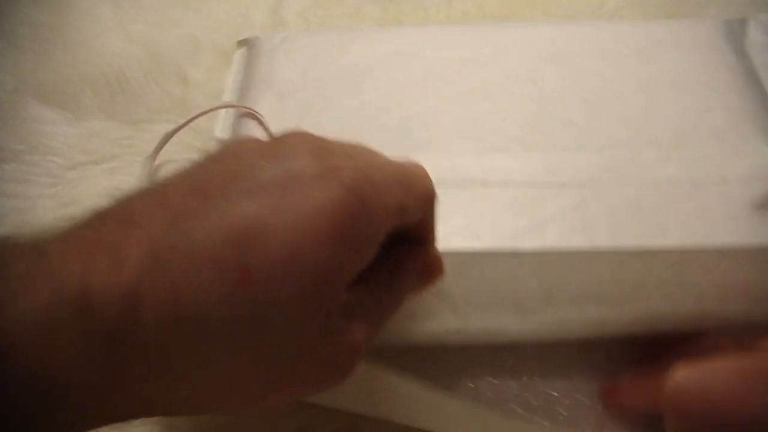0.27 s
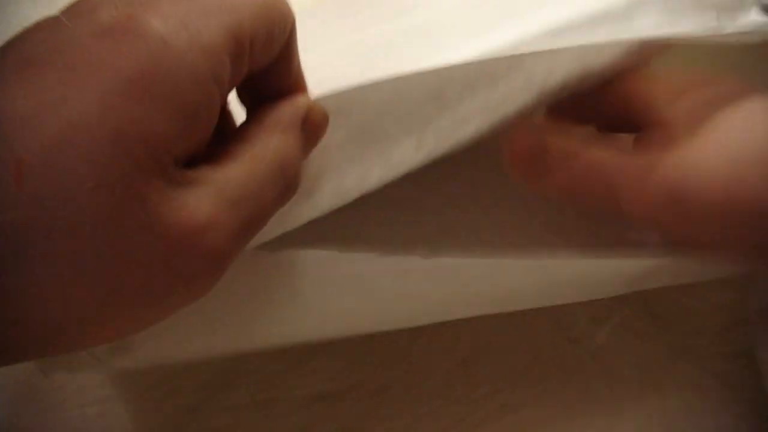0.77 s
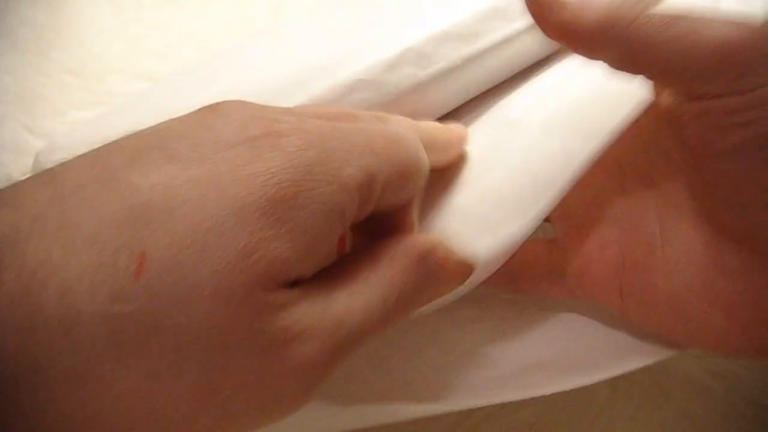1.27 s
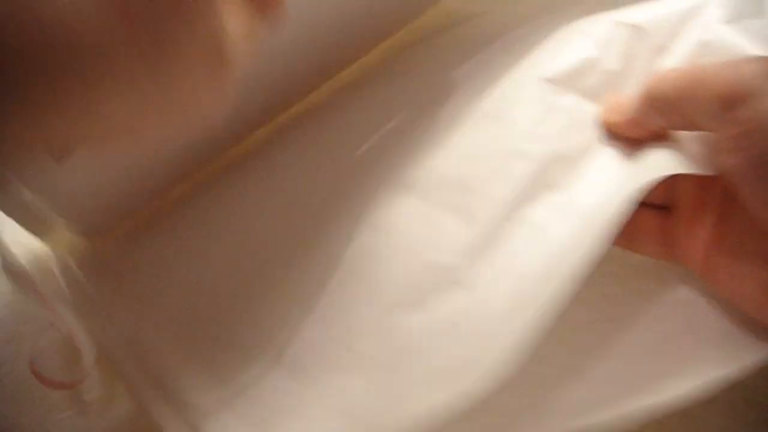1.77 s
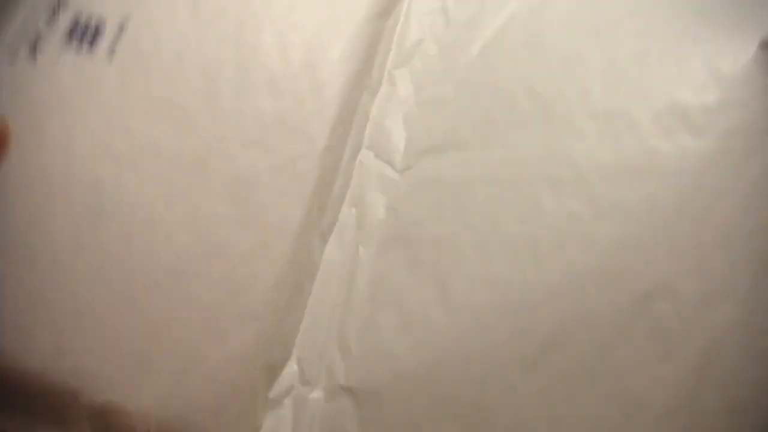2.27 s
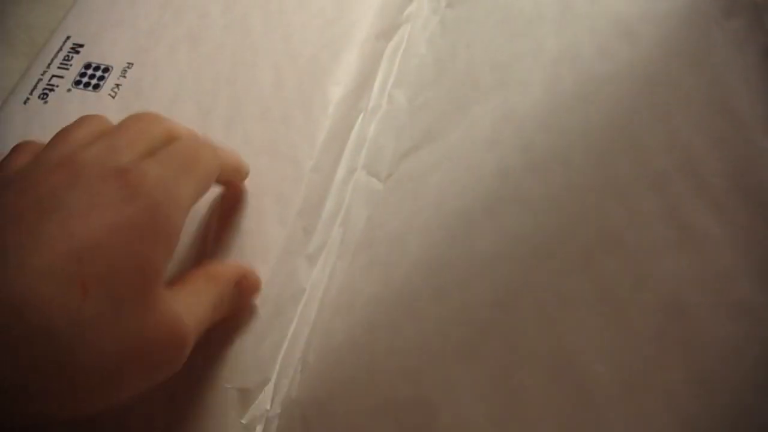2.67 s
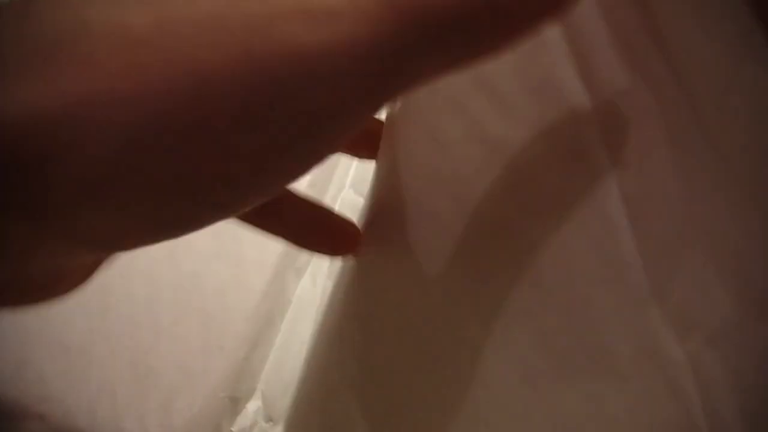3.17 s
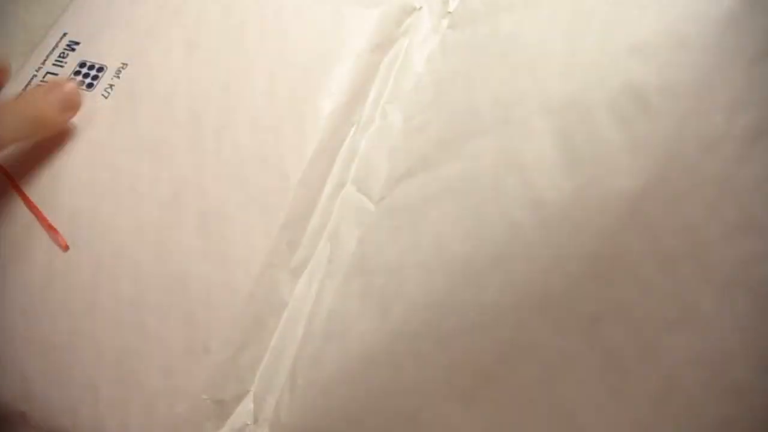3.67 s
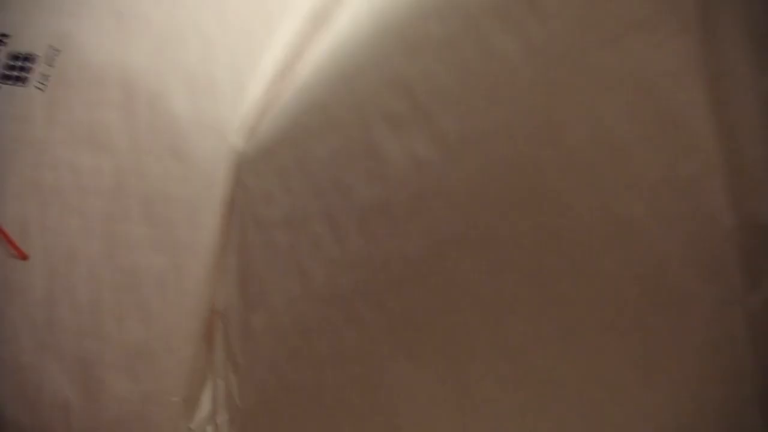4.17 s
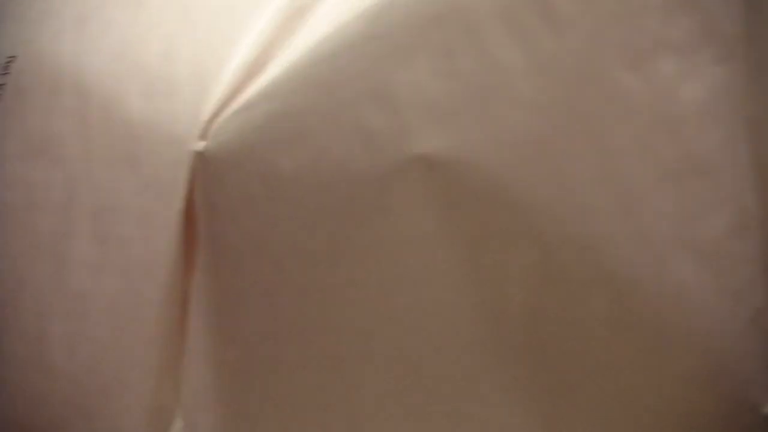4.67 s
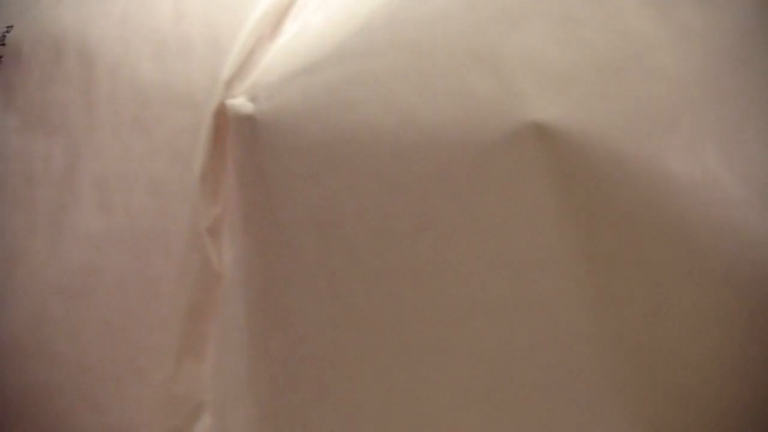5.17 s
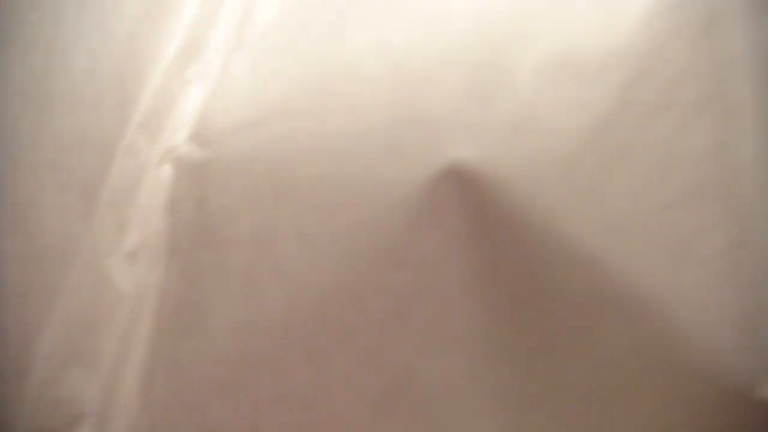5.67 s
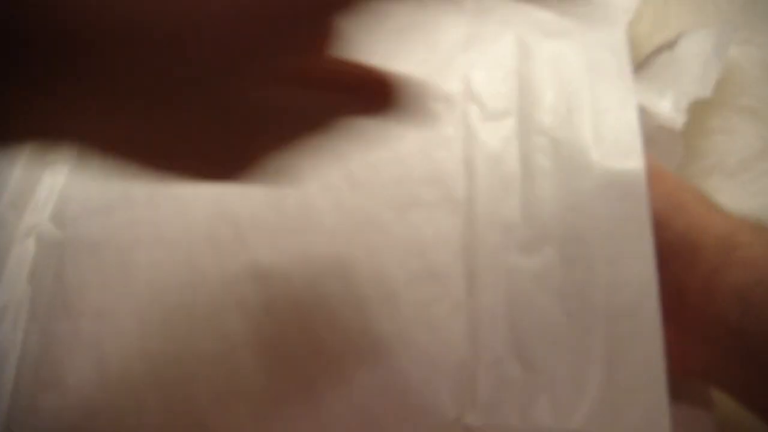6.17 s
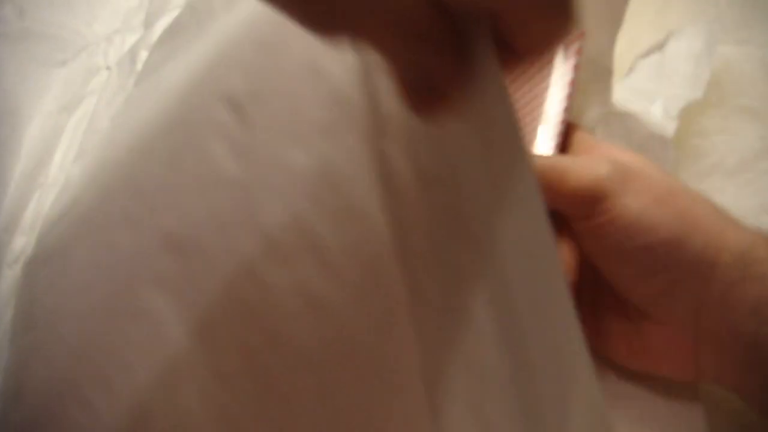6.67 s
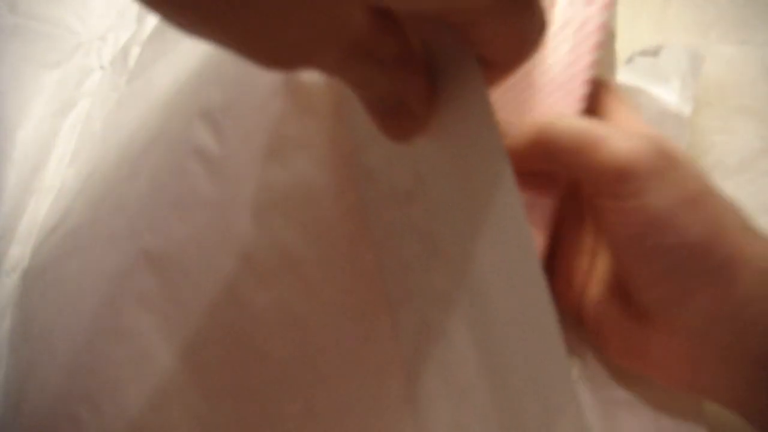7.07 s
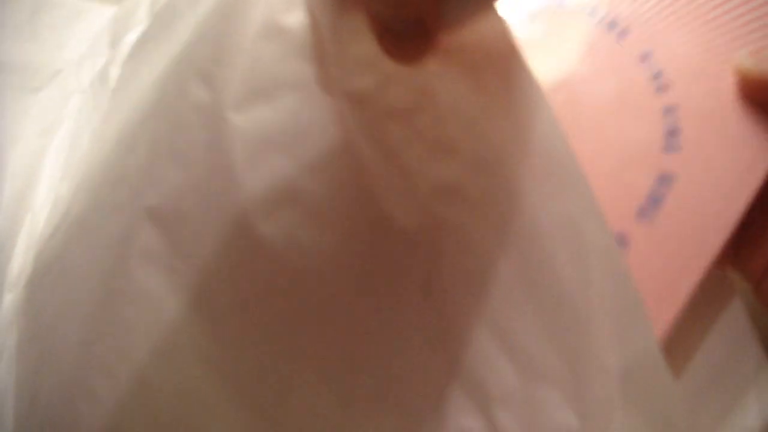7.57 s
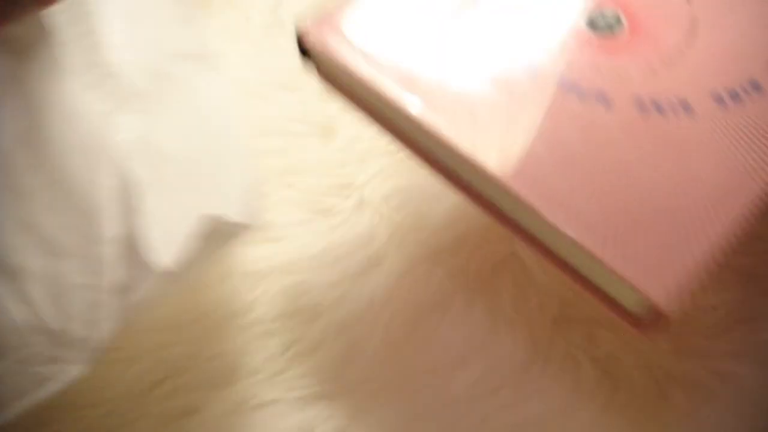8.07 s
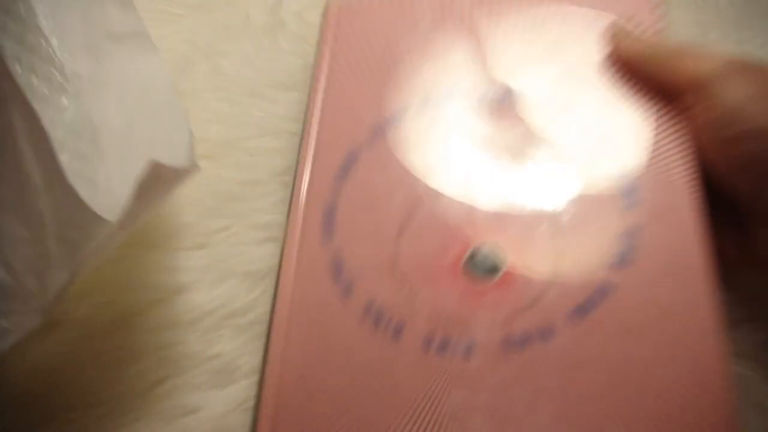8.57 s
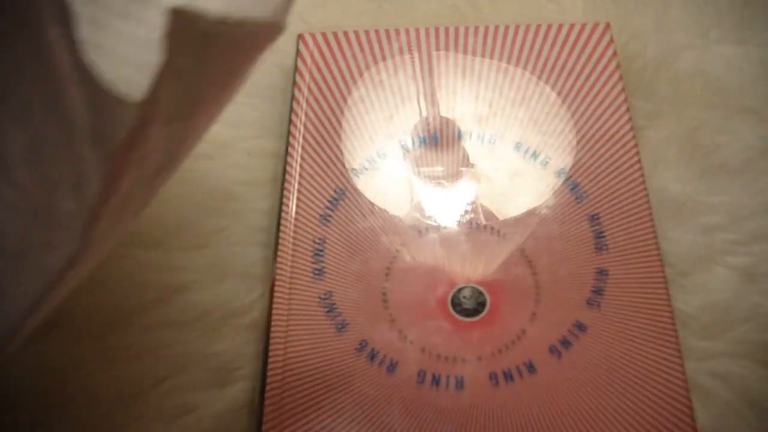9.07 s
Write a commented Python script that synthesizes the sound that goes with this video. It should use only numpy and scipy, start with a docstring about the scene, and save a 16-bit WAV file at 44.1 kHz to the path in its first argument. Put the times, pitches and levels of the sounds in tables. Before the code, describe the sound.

In a quiet, dry room, hands work a padded paper mailer very close to a small stereo camera. From 0 to 1.5 s, bright papery strokes, crackles and hard snaps come in quick succession, one especially sharp near 0.4 s, with dull envelope thumps. At about 1.6 s an edge catches in a short, quickening zip of ticks. From 2 to 4 s rustling continues in uneven bursts, with strong snaps near 2.6 and 4 s. Crumpling thickens around 5.3 to 5.9 s, then nearly pauses until 6.4 s. Dense, crunchy creasing resumes, leaning right, loudest around 7.2 to 7.6 s, with low bumps and rubbing as a book slides out. After 7.9 s only faint scuffs and a couple of small ticks remain over soft steady hiss and a barely audible thin whine, until about 9.3 s.

```python
"""Opening a padded paper mailer

Hands close to a small camera pull open a padded mailer, turn it over and slide a book out onto a soft rug.
Strokes drive noise grains: sliding fibres hiss, folds crackle and crumple, the slack envelope flaps low down.
Creases snap as noise bursts with a damped sine ring; thumps, scuffs and one zip-like run are resonant noise.
The room is quiet and dead, with soft hiss and a thin whine; two microphones hear the treble differently,
and the sharpest snaps overload them."""
import sys
import numpy as np
from scipy import signal
from scipy.fft import rfft, irfft
from scipy.io import wavfile
from scipy.ndimage import uniform_filter1d

SR = 44100
rng = np.random.default_rng(int(sys.argv[2]) if len(sys.argv) > 2 else 0)


def unload_wav(signal):
    """Save mono or channel-first audio to the path in sys.argv[1] as 16-bit WAV at rate SR, clipped to [-1, 1]."""
    wavfile.write(
        sys.argv[1],
        SR,
        np.round(np.clip(np.atleast_2d(signal).T, -1, 1) * 32767).astype(np.int16),
    )


N = 411894

# Strokes of the hands over the paper. Each row: start in seconds, length in seconds,
# sliding drive in dB, bend from 0 (flat slide) to 1 (crumple).
HAND_STROKES = [(0.012, 0.075, -25, .1), (0.081, 0.024, -16.5, 0.55), (0.138, 0.061, -24.5, 1),
                (0.238, 0.1, -25.5, 0.46), (0.328, 0.24, -25.5, 0.24), (0.588, .05, -23, 0.34),
                (0.678, 0.082, -22.5, .05), (0.767, 0.067, -19.5, 0.61), (0.862, 0.066, -22.5, 0.4),
                (0.946, 0.093, -20, 0.15), (1.056, .12, -25.5, 0.47), (1.194, 0.007, -18.5, 0.72),
                (1.34, 0.058, -16.5, 0.51), (1.406, 0.02, -25.5, 0.95), (1.483, 0.13, -27.5, 0.65),
                (1.877, 0.095, -23, .35), (2.008, .11, -26.5, 0.64), (2.23, 0.12, -27.5, 0.17),
                (2.425, 0.17, -27.5, 0.78), (2.79, 0.014, -21, 0.89), (2.832, 0.043, -23.5, 0.81),
                (2.893, 0.042, -16.5, 0.52), (3.014, 0.043, -17, 0.36), (3.086, 0.017, -16.5, 0.66),
                (3.301, 0.15, -24, 0.73), (3.463, 0.18, -22.5, 0.7), (3.66, 0.26, -29, 0.11),
                (3.862, 0.078, -22.5, 0.58), (3.983, .09, -31, 0.61), (4.067, 0.16, -21, 0.19),
                (4.234, 0.22, -24, 0.75), (4.49, 0.12, -24, 0.21), (4.633, 0.047, -22, 0.69),
                (4.695, 0.09, -25.5, .25), (4.907, 0.062, -28.5, 0.85), (4.999, .03, -22.5, 0.28),
                (5.053, 0.064, -27, 0.7), (5.274, 0.064, -21, 0.68), (5.334, 0.048, -18, 0.73),
                (5.4, 0.049, -23, 0.81), (5.443, 0.12, -21, 0.93), (5.556, 0.15, -22.5, 0.92),
                (5.703, 0.068, -23.5, 0.99), (5.788, 0.11, -22.5, 0.74), (6.03, 0.13, -33.5, 0.34),
                (6.48, 0.055, -26.5, 0.43), (6.531, 0.025, -18.5, 0.81), (6.589, 0.05, -23, 0.6),
                (6.647, 0.031, -16, 0.87), (6.709, 0.055, -23.5, 0.66), (6.804, 0.093, -30, 0.14),
                (7.077, 0.098, -25.5, .7), (7.202, 0.12, -23, 0.82), (7.327, 0.11, -23.5, 1.0),
                (7.466, 0.11, -29, 1.0), (7.59, 0.066, -24.5, 0.44), (7.651, .055, -21, 0.9),
                (7.742, 0.17, -28, 0.41), (8.052, 0.084, -36.5, 0.52), (8.172, 0.088, -36.5, 0.54),
                (8.297, .03, -48, .1), (8.38, 0.021, -55, .1), (8.45, 0.032, -42.5, 0.092),
                (8.574, 0.12, -45.5, 0.89), (9.002, 0.11, -44.5, 0.73)]
# Light contact between strokes. Each row: time in seconds, sliding drive in dB.
LIGHT_CONTACT = [(0, -25.5), (1.16, -42), (1.25, -42), (1.33, -24.5), (1.47, -37), (1.7, -28.5),
                 (2.75, -30), (4.85, -27.5), (5.2, -30.5), (5.95, -31.5), (6.25, -39), (7.05, -33.5),
                 (7.9, -41), (8.0, -40.5), (9.34, -44)]
# The main creases that snap through. Each row: time in seconds, overall drive in dB,
# brightness in dB (trades sheet for tick), ring in Hz.
MAIN_CREASES = [(0.02, -33.5, 16, 6000), (.1277, -15, 3, 2380), (0.1466, -19.5, 0, 3295),
                (0.2491, -17.5, 5, 5370), (0.261, -21.5, -4, 1960), (0.333, -23, 6.5, 2810),
                (0.387, -7, 1, 4460), (.453, -23.5, -2, 1920), (.548, -26.5, 2, 5130),
                (0.5842, -25, 8, 5130), (0.6206, -22, -2.5, 1370), (0.7371, -23.5, -3.5, 3830),
                (0.7936, -26, -4, 1240), (0.816, -20, 6, 5040), (.882, -20.5, 1.5, 3400),
                (.9214, -19.5, -1, 5000), (.9374, -26, 9.5, 2890), (1.017, -21.5, -3, 2145),
                (1.03, -23.5, 10, 5040), (1.0413, -28, 10, 5060), (1.0864, -17.5, 5, 6120),
                (1.2082, -13.5, 3, 2310), (1.2792, -24.5, 5, 4030), (1.2917, -24, 4, 5040),
                (1.3026, -21, 2, 3950), (1.386, -22, 1, 5730), (1.3985, -18.5, 2, 5200),
                (1.4287, -21.5, 5, 2560), (1.4407, -16, 2, 2980), (1.4965, -28, 5, 4740),
                (1.5564, -22, -1, 1190), (1.6486, -22, 3.5, 3960), (1.8011, -25, 4, 3570),
                (1.897, -21.5, -4.5, 1430), (1.9514, -19.5, -5, 1910), (2.065, -22.5, -2, 1265),
                (2.4776, -16, -1, 1890), (2.573, -22.5, 0.5, 4100), (2.6032, -12.5, -2, 5480),
                (2.8047, -20.5, 3, 4150), (2.856, -21, -6, 1380), (3.0464, -15.5, 1.5, 4750),
                (3.0589, -17, 2.5, 2955), (3.16, -26, -0.5, 5020), (3.183, -18, 0, 2015),
                (3.215, -23.5, 0.5, 3430), (3.2744, -17.5, 3, 4850), (3.319, -29.5, -10, 830),
                (3.3597, -31, -9, 1440), (3.408, -23, -5, 3820), (3.422, -28, -4, 1950),
                (3.5638, -16.5, -1.5, 730), (3.6182, -24.5, -6.5, 1026), (3.9992, -28, -5, 1610),
                (4.0101, -14, -7.5, 2330), (4.059, -19, -3.5, 1574), (4.0754, -17, 1, 3537),
                (4.1525, -16, -3, 2065), (4.3366, -23.5, -1, 4030), (4.4276, -19.5, -7.5, 2200),
                (4.493, -25, 1, 4540), (4.7476, -19.5, -1.5, 1550), (4.7652, -21, -4.5, 1780),
                (4.9062, -19, 3, 5220), (5.0107, -15.5, 0, 2384), (5.0215, -14.5, 2.5, 5050),
                (5.0998, -21, -3, 3650), (5.2455, -25, 2.5, 3396), (5.2713, -19, -3, 2100),
                (5.3682, -15, -4, 840), (5.3807, -20, -1, 3480), (5.4573, -18, -3, 2950),
                (5.4845, -16.5, 2, 3190), (5.623, -15, 2.5, 2530), (5.643, -20.5, 4, 2850),
                (5.709, -19, -5, 4970), (5.7553, -20, 1, 4680), (5.8281, -16.5, -0.5, 2610),
                (5.8638, -19, 3, 5060), (5.8888, -15.5, 4, 2186), (5.907, -17, -1, 2380),
                (6.139, -42, -11, 1350), (6.376, -42, 3, 3870), (6.434, -35, -4, 1600),
                (6.4498, -29, -1.5, 3690), (6.497, -18.5, 0.5, 3660), (6.5405, -18.5, -5, 1455),
                (6.716, -13.5, -2.5, 3080), (6.752, -20, 6, 4480), (6.775, -26, -9, 785),
                (6.855, -23.5, 3.5, 1420), (6.9276, -25, 2.5, 2720), (7.0063, -27, -0.5, 3120),
                (7.0977, -20, -2.5, 1890), (7.212, -19.5, 3, 4260), (7.2214, -18, 0.5, 4090),
                (7.273, -16.5, -2, 1416), (7.291, -16.5, 0, 1010), (7.3494, -11, 1.5, 5940),
                (7.3811, -21, 1, 1300), (7.4056, -15.5, -3, 1700), (7.4317, -20, 5, 5230),
                (7.446, -16.5, -0.5, 786), (7.4813, -20.5, 8.5, 2480), (7.5243, -19, -8.5, 863),
                (7.5352, -21, 4, 2330), (7.573, -16, -7, 830), (7.6843, -20.5, -3, 2550),
                (7.7263, -21.5, 0.5, 2420), (8.3558, -27.5, 1, 4040), (8.7138, -35.5, 8.5, 5980)]
# The padded envelope buckles or is bumped. Each row: time in seconds, relative level in dB, pitch in Hz.
ENVELOPE_THUMPS = [(0.099, -22.5, 252), (0.149, -34, 240), (0.786, -23, 310), (0.955, -30.5, 104),
                   (1.130, -26, 380), (1.209, -27.5, 116), (1.355, -23, 420), (1.443, -27, 260),
                   (1.850, -24, 457), (2.475, -22, 360), (2.603, -23, 330), (2.93, -38, 80),
                   (3.049, -39, 75), (3.565, -25, 200), (4.008, -28, 363), (5.46, -36, 75),
                   (4.426, -36, 168), (6.55, -19, 360), (7.23, -40, 80), (7.42, -31, 95), (7.665, -20, 230),
                   (7.806, -33.5, 160)]
# Fingers and the book scuff the paper. Each row: start in seconds, length in seconds, pitch in Hz,
# width in Hz, middle level in dB.
PAPER_SCUFFS = [(0.674, 0.088, 8050, 1500, -20), (2.883, 0.032, 3670, 1200, -16),
                (3.337, 0.036, 5800, 453, -21.5), (7.336, 0.092, 1090, 600, -20),
                (7.676, 0.028, 710, 300, -25), (7.811, 0.046, 1900, 804, -28.5),
                (7.894, 0.023, 1350, 350, -30), (8.034, 0.035, 1150, 1000, -35),
                (8.202, 0.026, 1480, 1000, -37), (8.883, 0.12, 1560, 750, -48)]
# An edge catches and slips in a quick run. Each row: time in seconds, slips per second, relative level in dB.
EDGE_SLIPS = [(1.594, 76, -19.5), (1.636, 92, -22), (1.675, 110, -23.5), (1.715, 128, -25),
              (1.748, 120, -33)]

# Colours of the paper: sliding fibres, crumpling folds, flexing envelope, ringing sheet,
# cracking crease and fibre tick. Each row: frequency in Hz, relative level in dB.
SLIDE_COLOUR = [(300, -38.5), (1200, -9), (2100, -5.5), (3400, -2.5), (6000, -1), (8500, 0), (11000, -1),
                (14500, -3.5)]
CRUMPLE_COLOUR = [(150, -28), (380, -12.5), (520, -5.5), (780, 3), (1020, -0.5), (1320, -0.5), (1900, -1),
                  (3000, -2), (7000, -23.5), (14000, -33)]
FLEX_COLOUR = [(15, -14), (35, -7), (65, -3), (120, -2), (200, -0.5), (400, 4), (550, -3.5), (1100, -14.5),
               (4000, -46)]
SHEET_COLOUR = [(50, -39.5), (200, -15.5), (500, -6), (780, 2.5), (1020, 2), (1350, 3.5), (1900, 1),
                (2600, -16), (6000, -41.5)]
CRACK_COLOUR = [(500, -38), (1400, -8.5), (2200, 2.5), (3600, 2), (5500, -1.5), (7500, -29), (14000, -26)]
TICK_COLOUR = [(1500, -25), (4500, -4), (6500, 3.5), (10000, 1.5), (14500, -1)]
# Steady background hiss. Each row: frequency in Hz, relative level in dB.
HISS_COLOUR = [(18, -39), (30, -11), (354, -20), (766, 11), (941, 0), (1020, -4), (1130, 4), (2630, -22),
               (13000, -12), (14000, 10.5)]
# Each microphone's own noise. Each row: frequency in Hz, relative level in dB.
SELF_NOISE_COLOUR = [(30, -5), (300, -2.5), (700, -1.5), (3000, -27), (8000, -32), (14000, -3.5)]
# The microphone pair. Each row: frequency in Hz, likeness of the two from 0 to 1,
# left minus right in dB, lead of the right in radians for a source fully off to the right.
MICROPHONE_PAIR = [(60, .97, .6, 0), (250, .99, .4, 0), (600, .996, .1, 0), (1200, .998, .1, 0),
                   (2600, .985, .1, .02), (4800, .76, .8, .25), (8000, .58, 2.0, 1.0),
                   (12000, .55, 3.2, 1.9), (14500, .5, 3.6, 2.8)]
# Where the sound sits. Each row: time in seconds, place from 0 (straight ahead) to 1 (off to the right).
PLACE = [(5.1, 0.37), (5.5, 0.32), (6.5, 0.63), (7.9, 0.51), (8.05, .1)]

HISS_DB, SELF_NOISE_DB = -46, -45
TOP_HZ = 14300
STROKE_ATTACK_S, STROKE_RELEASE_S = 0.011, 0.015  # time to get going; power decay once the hand stops
CONTACT_BEND = 0.2
# drive against the sliding drive: in a flat slide, and gained at full bend
CRUMPLE_FLAT_DB, CRUMPLE_BEND_DB = -18, 16.97
FLEX_FLAT_DB, FLEX_BEND_DB = -27.5, 16.9
# parts of a snap against its drive; the ring is set against the sheet or the crack
SHEET_DB, CRACK_DB, TICK_DB, RING_DB = -5.5, -0.5, 0.86, 2
# power decay times: the parts of a snap take shares of the first; large facets ring longer
SNAP_DECAY_MS, RING_CYCLES = 2.04, 2.45
LESSER_DB, LESSER_SPREAD_DB = -1, 2  # against the rustle around them
LESSER_BRIGHT_DB, LESSER_BRIGHT_SPREAD_DB = -1, 3.5
LESSER_RING_HZ, RING_OCTAVES_PER_DB = 2319, 0.07  # ring at zero brightness; rise with brightness
THUMP_CYCLES = 2.9  # amplitude decay of the push, in cycles of its note


def undb(db):
    """Decibels to gain."""
    return 10 ** (np.asarray(db) / 20)


def unit(x):
    """Scale to rms 1."""
    return x / np.sqrt(np.mean(x ** 2))


def on_axis(hz, table, column=1):
    """Read a column of a table along log frequency."""
    table = np.array(table, float)
    return np.interp(np.log(hz + 1), np.log(table[:, 0]), table[:, column])


def colour(x, points, size=4096):
    """Causal minimum-phase filter with the given spectrum; white noise keeps its power."""
    gain = undb(on_axis(np.fft.rfftfreq(size, 1 / SR), points))
    # fold the cepstrum so that the response has no part before time zero
    cepstrum = irfft(np.log(gain))
    cepstrum[1:size // 2] *= 2
    cepstrum[size // 2 + 1:] = 0
    response = irfft(np.exp(rfft(cepstrum)))
    response = response / np.linalg.norm(response)
    return signal.fftconvolve(x, response[None], axes=1)[:, :N]


def bandpass(x, hz, width_hz):
    """A broad resonance."""
    upper = width_hz / 2 + np.hypot(hz, width_hz / 2)
    lower = hz ** 2 / upper
    return signal.sosfilt(signal.butter(2, [lower, upper], "band", fs=SR, output="sos"), x)


def noise(count=N):
    """Two unrelated noises; for a source, what both microphones share and what sets them apart."""
    return rng.standard_normal((2, count))


def walk(rate):
    """Random levels held for 1 / rate seconds and slewed twice; rms 1."""
    hold = max(int(SR / rate), 1)
    steps = np.repeat(rng.standard_normal(N // hold + 1), hold)
    slewed = uniform_filter1d(uniform_filter1d(steps, hold), hold)
    return unit(slewed[:N])


def fade(power, decay_ms):
    """Let every pulse of power die away exponentially."""
    keep = np.exp(-1000 / (decay_ms * SR))
    return signal.lfilter([1 - keep], [1, -keep], power)


def add(track, s, sound):
    """Mix a sound into a track at time s."""
    start = max(int(s * SR), 0)
    track[:, start:start + sound.shape[-1]] += sound[..., :N - start]


def background():
    """Soft steady coloured hiss with a faint, slightly wavering thin whine."""
    tone = np.sqrt(2) * np.sin(2 * np.pi * 1028 * np.arange(N) / SR)
    whine = tone * undb(-66 + 2 * walk(7))
    return colour(noise(), HISS_COLOUR) * undb(HISS_DB) + whine


def effort():
    """Drives in dB of sliding, crumpling and flexing: strokes rise, hold and die; bending feeds the last two."""
    t = np.arange(N) / SR
    flat_db = np.array([[0], [CRUMPLE_FLAT_DB], [FLEX_FLAT_DB]])
    bend_db = np.array([[0], [CRUMPLE_BEND_DB], [FLEX_BEND_DB]])

    def shares(bend):
        """Power of the three kinds of motion against the sliding."""
        return undb(flat_db + bend_db * bend) ** 2

    contact_db = np.interp(t, *np.transpose(LIGHT_CONTACT))
    power = shares(CONTACT_BEND) * undb(contact_db) ** 2
    for s, length, db, bend in HAND_STROKES:
        age = t[:int((length + 10 * STROKE_RELEASE_S) * SR)]
        rise = np.minimum(age / STROKE_ATTACK_S, 1)
        release = np.exp(-np.maximum(age - length, 0) / STROKE_RELEASE_S)
        add(power, s, shares(bend) * rise * release * undb(db) ** 2)
    return 10 * np.log10(power)


def slips(rate, spread_db, limit):
    """Power pulses of tiny slips at random moments, many weak and few strong; mean 1."""
    sizes = undb(spread_db * np.minimum(rng.exponential(size=N), limit)) ** 2
    power = sizes * (rng.random(N) < rate / SR)
    return power / power.mean()


def grainy(power, decay_ms, smooth):
    """Noise made of short bursts that swell and die, one for each slip, over a share of even friction."""
    bursts = fade(fade(power, decay_ms / 2), decay_ms / 2)
    return noise() * np.sqrt(smooth + (1 - smooth) * bursts)


def handling(slide_db, crumple_db, flex_db):
    """Sliding fibres hiss, folds crackle and the envelope flexes, all in the same uneven jerks of the hands."""
    jerks = walk(70)
    wide_folds = slips(rate=330, spread_db=3.5, limit=3.04)
    tight_folds = slips(rate=260, spread_db=5.5, limit=3.0)
    fibres = slips(rate=2000, spread_db=1.5, limit=5.0)

    # tight folds tick in the treble and crack; wide ones sound duller and ring longer in the sheet
    fold_ticks = grainy(tight_folds + 0.5 * wide_folds, decay_ms=0.29, smooth=0)
    hiss = grainy(fibres, decay_ms=0.17, smooth=0.56) + undb(-5.5) * fold_ticks
    slide = colour(unit(hiss) * undb(slide_db + 1.26 * jerks + 2.0), SLIDE_COLOUR)

    crumpling = undb(crumple_db + 1.64 * jerks)
    dull_folds = grainy(wide_folds, decay_ms=1.97, smooth=0.091)
    crumple = colour(dull_folds * crumpling * undb(0.55), CRUMPLE_COLOUR)
    sharp_folds = grainy(tight_folds, decay_ms=1.2, smooth=0)
    crackle = colour(sharp_folds * crumpling * undb(-9), CRACK_COLOUR)

    flapping = grainy(wide_folds, decay_ms=5.2, smooth=0.35)
    flex = colour(flapping * undb(flex_db + 6.4 * jerks - 2.16), FLEX_COLOUR)
    return slide + crumple + crackle + flex


def lesser_creases(rustle_db, count=170):
    """Small snaps at random moments, about as strong as the rustle around them; brighter ones ring higher."""
    moment, *chance = rng.random((count, 3)).T
    at = (moment * (N - 1)).astype(int)
    # uniform chances with spread 1
    strength, bright = np.sqrt(12) * (np.array(chance) - 0.5)
    level_db = rustle_db[at] + LESSER_DB + LESSER_SPREAD_DB * strength
    bright_db = LESSER_BRIGHT_DB + LESSER_BRIGHT_SPREAD_DB * bright
    ring_hz = LESSER_RING_HZ * 2 ** (RING_OCTAVES_PER_DB * bright_db)
    return list(zip(at / SR, level_db, bright_db, ring_hz))


def burst(t, decay_ms, tail_db, tail_ms):
    """Envelope of a snap over t in ms: the crease strains, gives at 0 and shivers; rms 1 over its first 9 ms."""
    after = np.maximum(t, 0)
    power = np.exp(-after / decay_ms) + undb(tail_db) ** 2 * np.exp(-after / tail_ms)
    giving = np.sqrt(power) * (1 - np.exp(-after / 0.1))
    straining = undb(-13) * np.exp(-np.abs(t) / 0.81)
    shape = giving + straining
    return shape / np.sqrt(np.mean(shape[(t > 0) & (t < 9)] ** 2))


def snaps(creases, count=2600):
    """A crease gives: a fibre tick, a crack, and the slower ring of the facet of paper around it."""
    lead = 0.006  # seconds of strain before the crease gives
    seconds = np.arange(count) / SR
    t = (seconds - lead) * 1000
    sheet_shape = burst(t, 0.75 * SNAP_DECAY_MS, tail_db=-16.5, tail_ms=8.8)
    crack_shape = burst(t, 0.56 * SNAP_DECAY_MS, tail_db=-17.5, tail_ms=9)
    tick_shape = burst(t, 0.48 * SNAP_DECAY_MS, tail_db=-29, tail_ms=6)
    sheet, crack, tick, rings = np.zeros((4, 2, N))
    for s, db, bright_db, ring_hz in creases:
        sheet_db = db + SHEET_DB - bright_db
        crack_db = db + CRACK_DB
        tick_db = db + TICK_DB + bright_db
        # the fibres along a crease let go in a ragged run
        steps = np.repeat(rng.standard_normal(count // 20), 20)
        ragged = unit(undb(2.3 * uniform_filter1d(steps, 10)))
        add(sheet, s - lead, noise(count) * sheet_shape * undb(sheet_db))
        add(crack, s - lead, noise(count) * ragged * crack_shape * undb(crack_db))
        add(tick, s - lead, noise(count) * ragged * tick_shape * undb(tick_db))
        # large facets ring with the sheet, small stiff ones with the crack
        ring_db = sheet_db if ring_hz < 2000 else crack_db
        ring_shape = burst(t, 1000 * RING_CYCLES / ring_hz, tail_db=-35, tail_ms=4)
        ring = np.sin(2 * np.pi * ring_hz * seconds) * ring_shape
        # the ring goes only into what both microphones share
        add(rings[:1], s - lead, ring * undb(ring_db + RING_DB))
    return colour(sheet, SHEET_COLOUR) + colour(crack, CRACK_COLOUR) + colour(tick, TICK_COLOUR) + rings


def thumps(count=6000):
    """The air cushion in the envelope answers a push with a dull, heavily damped note."""
    out, t = np.zeros((2, N)), np.arange(count) / SR
    for s, db, hz in ENVELOPE_THUMPS:
        push = noise(count) * np.exp(-t * hz / THUMP_CYCLES)
        note = bandpass(push, hz, 0.75 * hz)
        peak = np.abs(note).max(axis=1, keepdims=True)
        add(out, s, note / peak * undb(db + 1.5))
    return out


def scuffs():
    """Short uneven rubs, each singing in the patch of paper that it stretches."""
    out = np.zeros((2, N))
    for s, length, hz, width_hz, db in PAPER_SCUFFS:
        count = int(length * SR)
        rub = unit(bandpass(noise(count), hz, width_hz))
        uneven = undb(db + 2 * walk(150)[:count])
        add(out, s, rub * np.sqrt(np.hanning(count)) * uneven)
    return out


def zip_run():
    """Stick and slip: sharp ticks that weaken while their rate mostly climbs, each ringing the stiff edge."""
    s, rate, db = np.transpose(EDGE_SLIPS)
    t = np.arange(int(s[0] * SR), int(s[-1] * SR)) / SR
    # one slip each time the running count passes a whole number
    turns = np.floor(np.cumsum(np.interp(t, s, rate)) / SR)
    slip = np.diff(turns, prepend=-1)
    power = np.zeros((1, N))
    add(power, s[0], slip * undb(np.interp(t, s, db)) ** 2 * SR / rate.mean())
    ticks = noise() * np.sqrt(fade(power, decay_ms=0.42))
    sharp = undb(-2.0) * colour(ticks, TICK_COLOUR)
    crack = undb(-6.0) * colour(ticks, CRACK_COLOUR)
    edge = undb(2) * bandpass(ticks, 3800, 900)
    return sharp + crack + edge


def microphones(x, offside):
    """Both microphones hear the bass alike; the treble differs and, off to one side, comes earlier there."""
    hz = np.fft.rfftfreq(N, 1 / SR)
    likeness = on_axis(hz, MICROPHONE_PAIR, column=1)
    balance_db = on_axis(hz, MICROPHONE_PAIR, column=2)
    lead = offside * on_axis(hz, MICROPHONE_PAIR, column=3)
    shared, apart = rfft(x)
    shared = shared * np.sqrt((1 + likeness) / 2)
    apart = 1j * apart * np.sqrt((1 - likeness) / 2)
    tilt = undb(balance_db / 2) * np.exp(-0.5j * lead)
    # treble that differs between the two adds width on top of the centre
    width = np.sqrt(2 / (1 + likeness * np.cos(lead) + 1e-3))
    left, right = (shared + apart) * tilt, (shared - apart) / tilt
    return irfft(np.array([left, right]) * width, N)


def scene():
    """All the paper sounds over the quiet room, with a faint hollow ring under the paper."""
    slide_db, crumple_db, flex_db = effort()
    rustle_db = (slide_db + crumple_db) / 2
    creases = lesser_creases(rustle_db) + list(MAIN_CREASES)
    paper = handling(slide_db, crumple_db, flex_db) + snaps(creases) + thumps() + scuffs() + zip_run()
    hollow = undb(-5.5) * bandpass(paper, hz=438, width_hz=24)
    sound = paper + hollow + background()
    # blend the pair as heard from straight ahead and from the right
    bearing = np.interp(np.arange(N) / SR, *np.transpose(PLACE))
    return bearing * microphones(sound, offside=1) + (1 - bearing) * microphones(sound, offside=0)


def record(dry):
    """The camera adds its own noise, flattens the sharpest snaps at full scale and cuts the top treble."""
    picked_up = dry + colour(noise(), SELF_NOISE_COLOUR) * undb(SELF_NOISE_DB)
    overloaded = np.clip(picked_up, -1, 1)
    return signal.sosfilt(signal.ellip(10, 0.2, 70, TOP_HZ, fs=SR, output="sos"), overloaded)


dry = scene()
out = record(dry)
unload_wav(out)
```